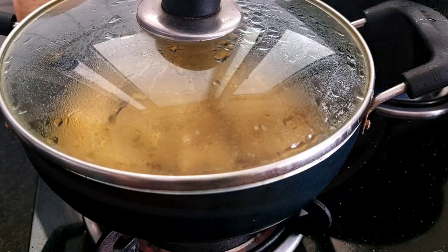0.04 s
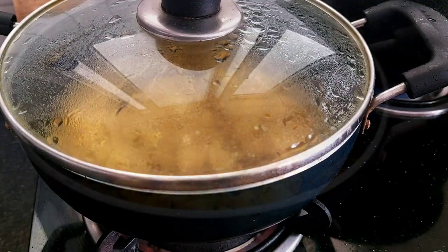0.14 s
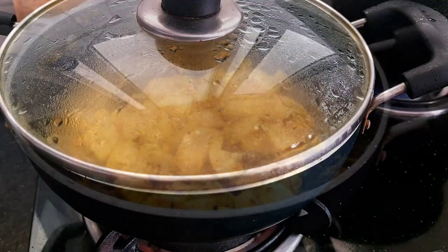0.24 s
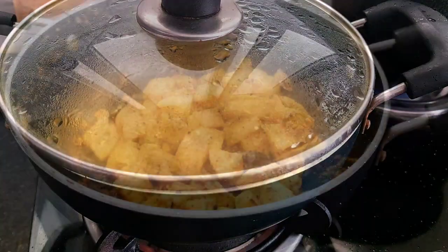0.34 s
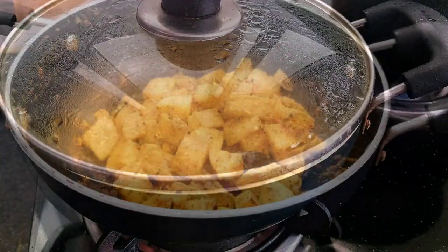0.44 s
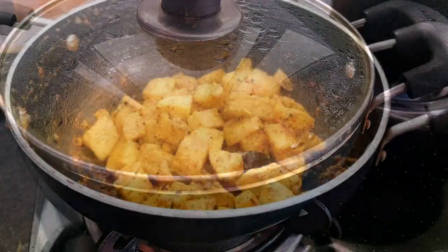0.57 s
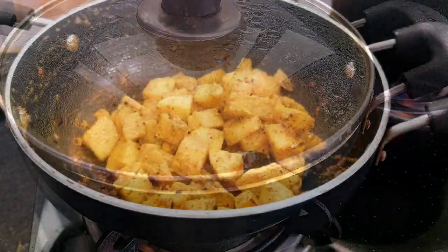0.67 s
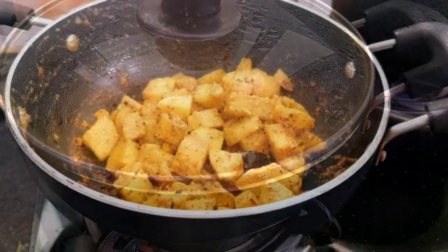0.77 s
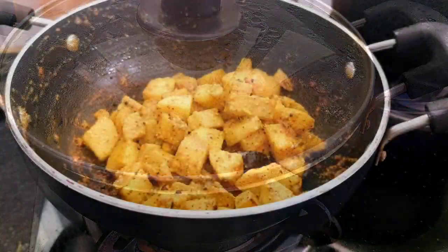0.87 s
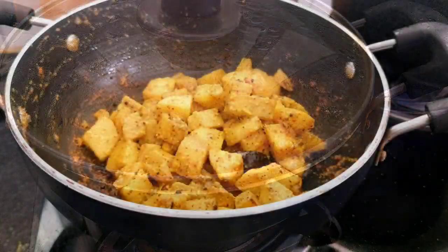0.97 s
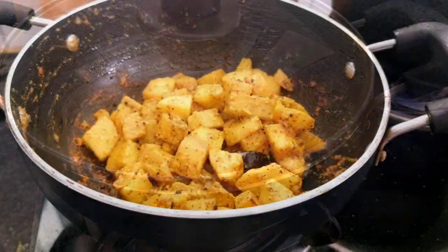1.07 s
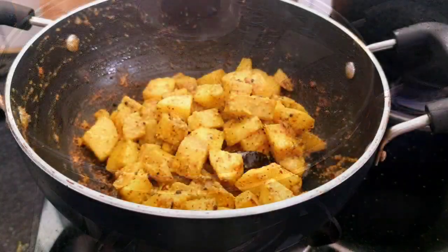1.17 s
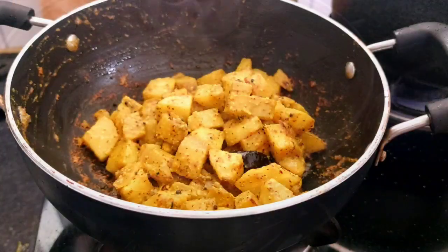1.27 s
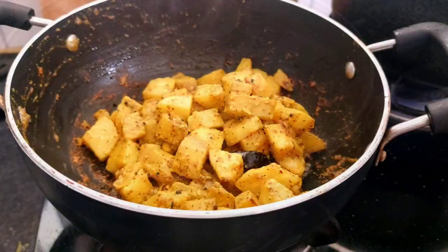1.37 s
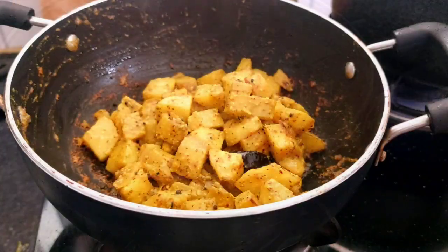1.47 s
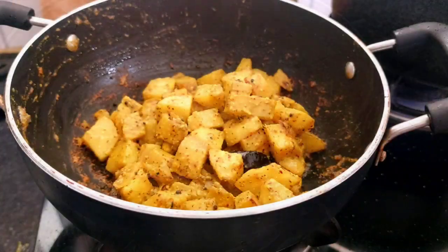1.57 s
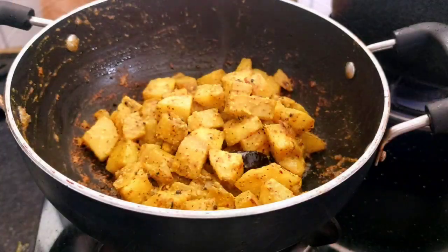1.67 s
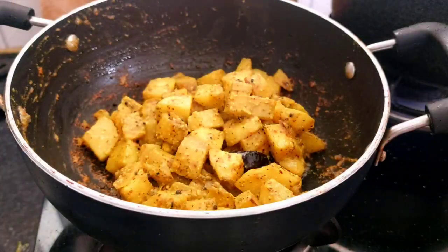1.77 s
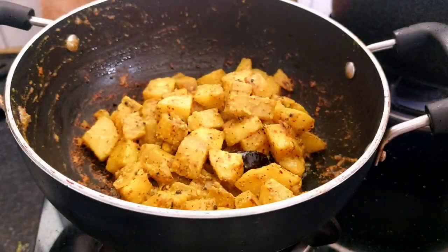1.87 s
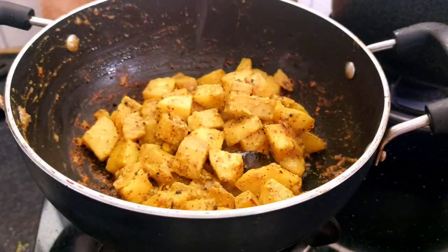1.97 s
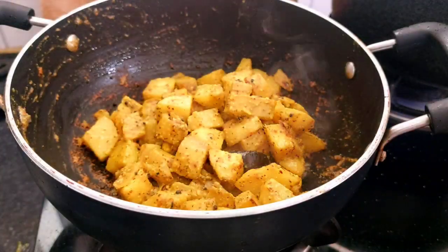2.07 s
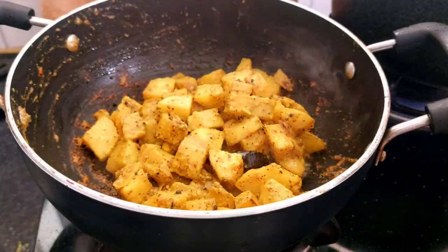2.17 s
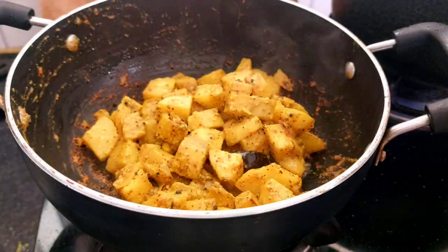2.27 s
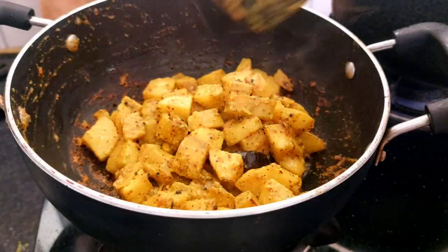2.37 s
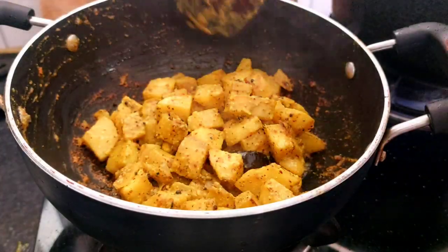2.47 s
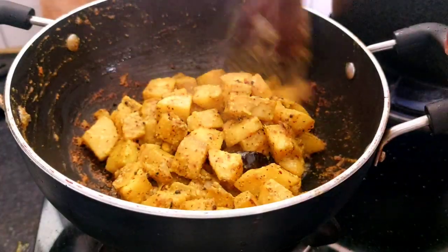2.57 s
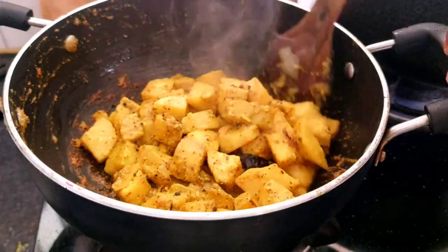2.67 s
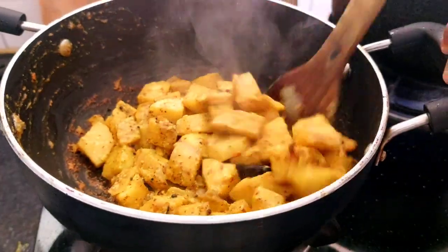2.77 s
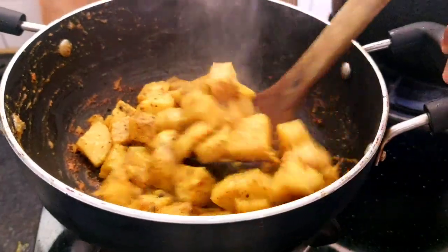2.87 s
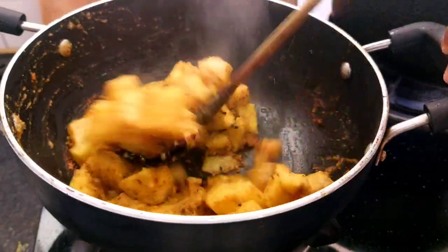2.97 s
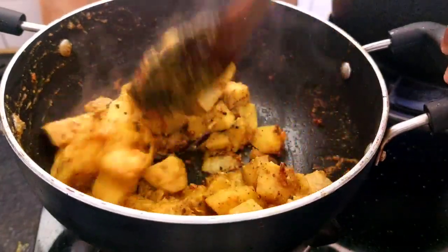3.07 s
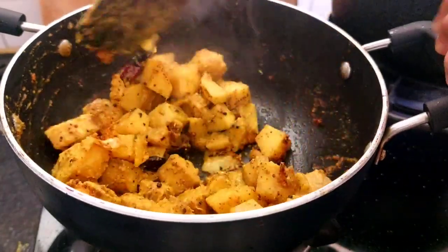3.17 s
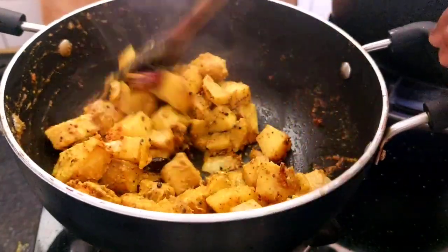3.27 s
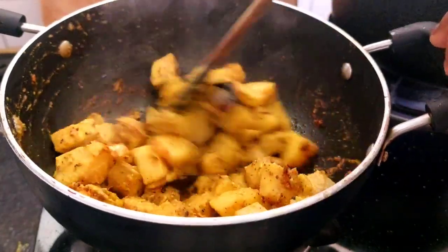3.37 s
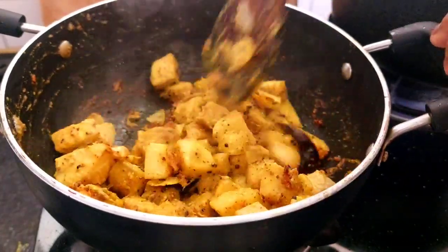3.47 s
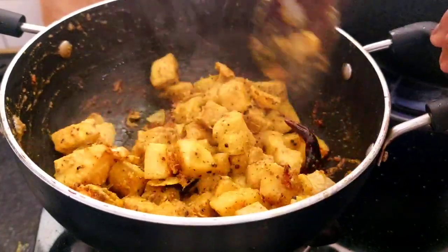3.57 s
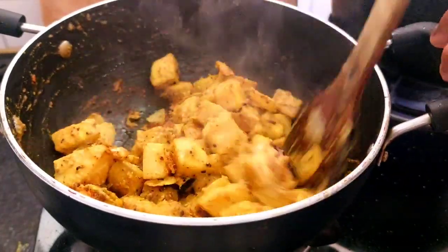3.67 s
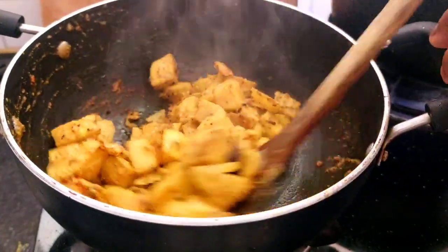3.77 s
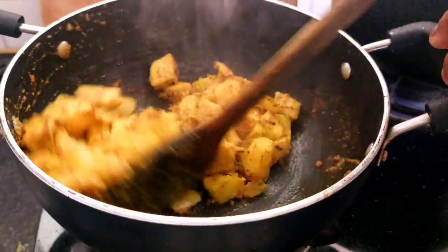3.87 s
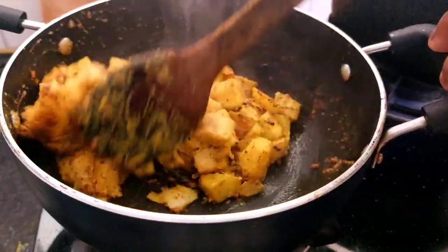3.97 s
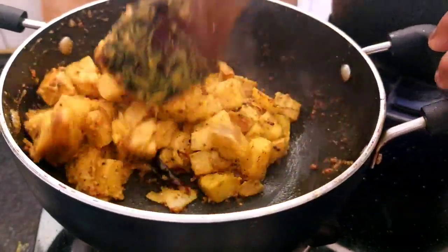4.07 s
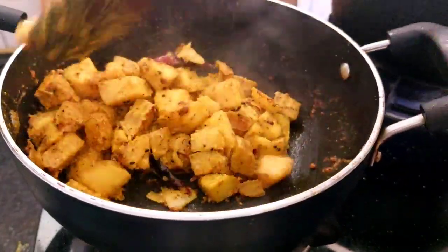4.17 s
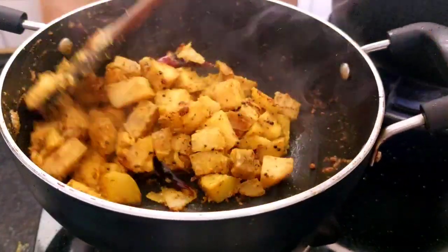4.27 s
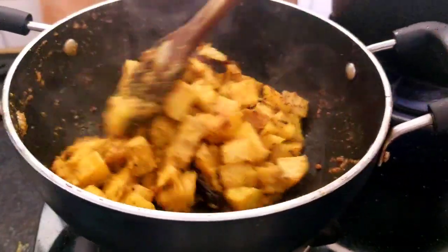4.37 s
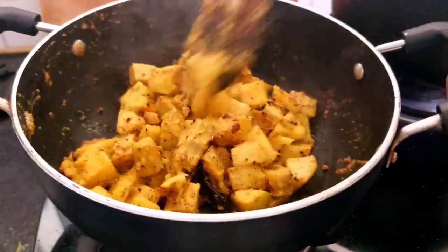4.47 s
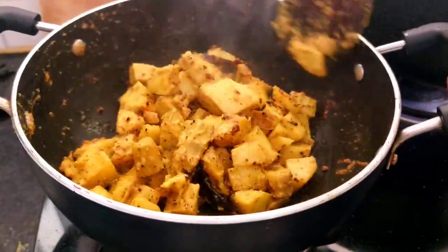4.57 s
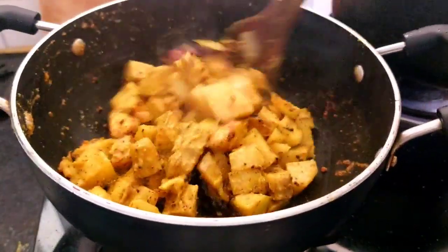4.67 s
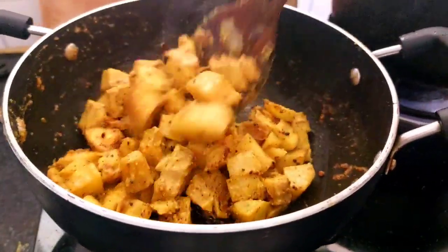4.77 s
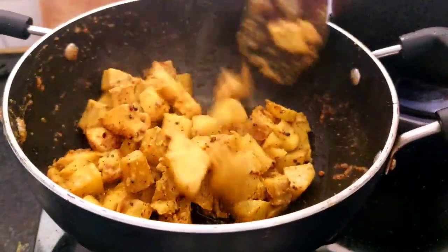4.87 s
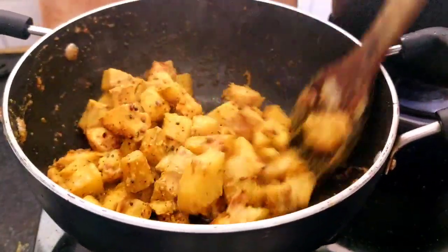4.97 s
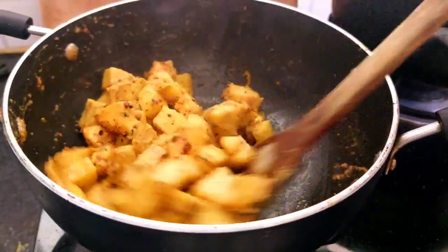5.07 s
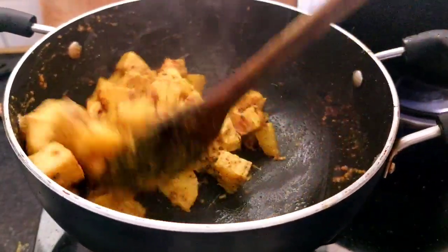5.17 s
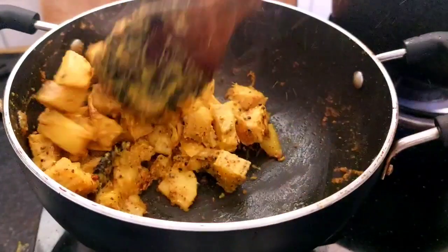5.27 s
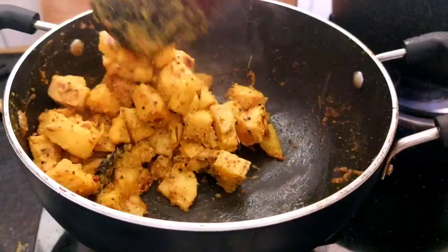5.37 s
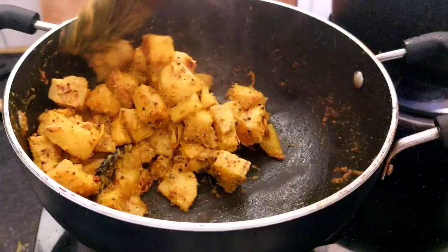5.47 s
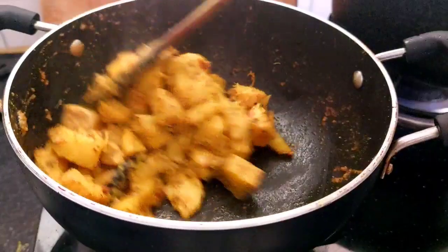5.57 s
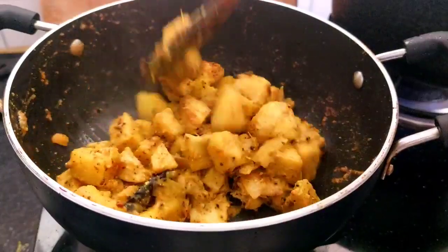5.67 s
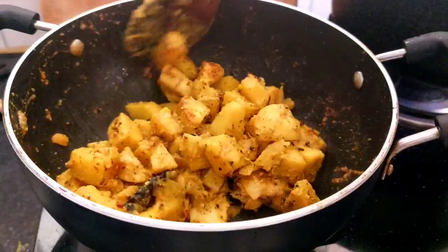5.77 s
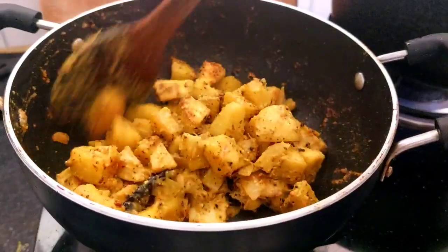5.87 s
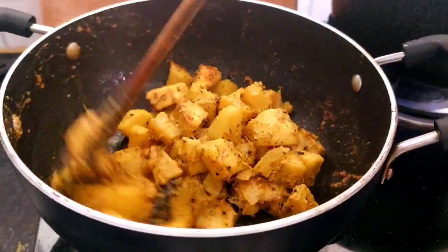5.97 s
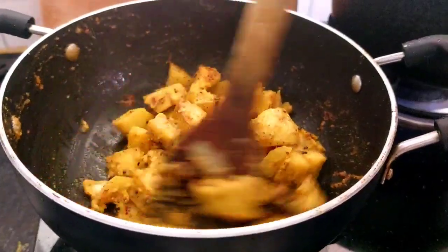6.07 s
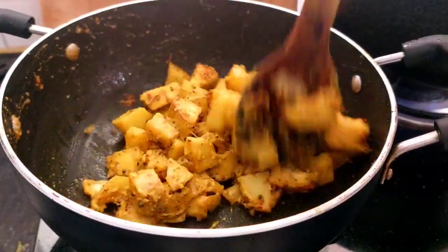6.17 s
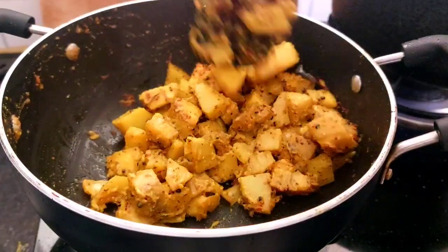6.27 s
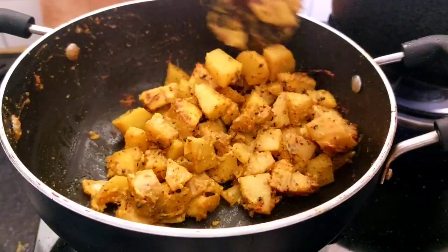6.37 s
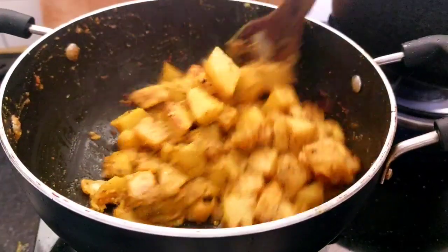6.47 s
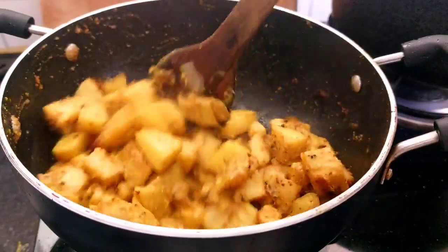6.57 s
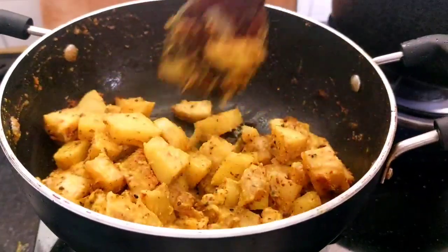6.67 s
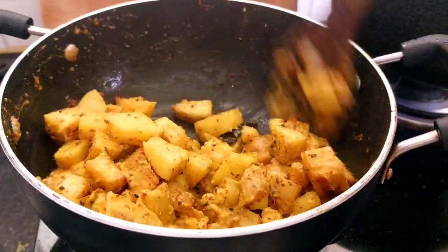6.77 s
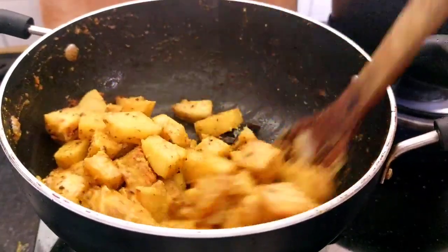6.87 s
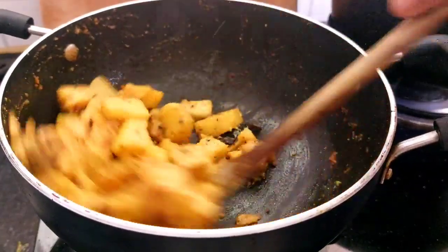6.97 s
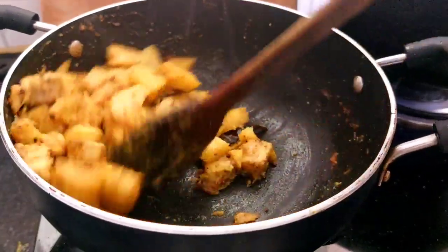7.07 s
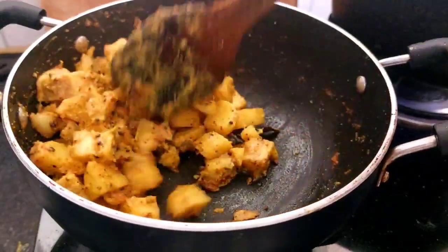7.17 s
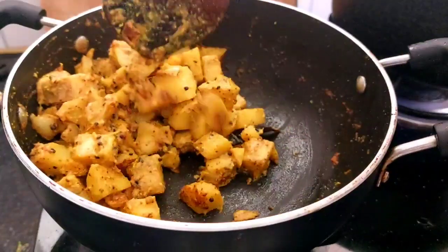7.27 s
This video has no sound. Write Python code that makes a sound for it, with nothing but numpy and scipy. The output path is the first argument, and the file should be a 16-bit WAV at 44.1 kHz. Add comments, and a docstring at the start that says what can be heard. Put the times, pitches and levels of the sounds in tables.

```python
"""Diced vegetables fry in oil over a gas burner, close by, in a small kitchen.
The sound fades in: the flame flutters, steam bubbles crackle, water drops spit in the oil.
At 1 s a glass lid is put down to one side and rings; from 1.5 s on, the pan is knocked.
From 2.7 s a wooden spatula scrapes and turns the pieces: wet faces meet hot metal
and the sizzle swells in repeated flares."""
import sys
import numpy as np
from scipy import signal
from scipy.fft import rfft, irfft
from scipy.io import wavfile
from scipy.ndimage import uniform_filter1d

SR = 44100
rng = np.random.default_rng(int(sys.argv[2]) if len(sys.argv) > 2 else 0)


def unload_wav(signal):
    """Save mono or channel-first audio to the path in sys.argv[1] as 16-bit WAV at rate SR, clipped to [-1, 1]."""
    wavfile.write(
        sys.argv[1],
        SR,
        np.round(np.clip(np.atleast_2d(signal).T, -1, 1) * 32767).astype(np.int16),
    )


N = 323253
TIME_S = np.arange(N) / SR
FREQ_HZ = np.fft.rfftfreq(N, 1 / SR)


def gain(db):
    """Decibels to amplitude."""
    return 10 ** (np.asarray(db) / 20)


def unit_rms(x):
    """Scales to rms 1."""
    return x / np.sqrt(np.mean(x ** 2) + 1e-20)


def at_hz(curve, hz):
    """Interpolates on a log-frequency axis."""
    freqs, values = np.transpose(curve)
    return np.interp(np.log(hz + 1), np.log(freqs + 1), values)


def add(mix, start_s, sound):
    """Mixes a sound in at start_s."""
    part = mix[..., round(start_s * SR):][..., :sound.shape[-1]]
    part += sound[..., :part.shape[-1]]


def balance(left_db):
    """Stereo gains for a left-minus-right level."""
    return gain(np.array([[.5], [-.5]]) * left_db)


def drift(cutoff_hz):
    """Slow random fluctuation, rms 1."""
    return unit_rms(irfft(rfft(rng.standard_normal(N)) / (1 + (FREQ_HZ / cutoff_hz) ** 4), N))


def stirring(t, start_s=2.68, rise_s=0.044):
    """0 before the spatula sets to work, 1 after."""
    return np.clip((t - start_s) / rise_s, 0, 1)


# left-right likeness: (frequency [Hz], coherence [0-1])
COHERENCE = [(60, 0.77), (150, 0.93), (300, 0.78), (600, 0.68), (1200, 0.13), (2200, 0.03), (16000, 0.02)]
# stereo balance: (frequency [Hz], left minus right [dB])
BALANCE = [(60, 12.5), (99, 0), (160, 7), (270, -2.5), (450, 1), (740, 1), (1220, 3), (2010, 3), (3330, 0),
           (5500, 2.0), (9080, 2.5), (15000, -0.5)]
def coloured(pair, spectrum):
    """Shapes spectrum and stereo image; long waves reach both sides alike."""
    spectra = rfft(pair)
    angle = np.arcsin(np.clip(at_hz(COHERENCE, FREQ_HZ), 0, 1)) / 2
    blended = spectra * np.cos(angle) + spectra[::-1] * np.sin(angle)
    shaped = blended * gain(at_hz(spectrum, FREQ_HZ)) * balance(at_hz(BALANCE, FREQ_HZ))
    return unit_rms(irfft(shaped, N))


# reverberation: (frequency [Hz], t60 [s])
ROOM_DECAY = [(150, 0.35), (600, 0.24), (3000, 0.25), (15000, 0.053)]
def kitchen(pair, build_s=0.0038):
    """Diffuse reflections from near walls, each band dying at its own rate."""
    onset = np.clip(TIME_S[:SR // 2] / build_s - .5, 0, 1)
    hz, t, bands = signal.stft(rng.standard_normal((2, len(onset))) * onset, SR, nperseg=256)
    coherence = np.clip(at_hz(COHERENCE, hz), 0, 1)[:, None]
    bands[1] = coherence * bands[0] + np.sqrt(1 - coherence ** 2) * bands[1]
    decay = gain(-60 * t / at_hz(ROOM_DECAY, hz)[:, None])
    tail = signal.istft(bands * decay, SR, nperseg=256)[1]
    return signal.fftconvolve(pair, tail / np.linalg.norm(tail[0]), axes=1)[:, :N]


# flame loudness: (time [s], level [dB])
FLAME_LEVEL = [(0, -53.5), (1.1, -50.5), (1.4, -51.5), (4.8, -55), (5.5, -58), (7.33, -59)]
# flame spectrum: (frequency [Hz], density [dB])
FLAME_SPECTRUM = [(15, -26), (30, -11), (50, -10), (68, -0.5), (82, -2), (98, 0.5), (135, -7), (200, -7),
                  (400, -16), (1000, -45)]
def burner():
    """The gas flame flutters low under the pan."""
    level_db = np.interp(TIME_S, *np.transpose(FLAME_LEVEL))
    return coloured(rng.standard_normal((2, N)), FLAME_SPECTRUM) * gain(level_db)


# spectrum of the shifting pieces: (frequency [Hz], density [dB])
TUMBLE_SPECTRUM = [(100, -23), (190, -8.5), (245, -3.5), (300, -1.5), (390, -1.5), (560, -6.5), (750, -5),
                   (1100, -11.5), (3000, -68)]
def tumble(calm_db=-52, stirred_db=-50, lumpy_db=2):
    """Soft pieces shift and bubble against the pan in dull lumps, more so when stirred."""
    lumps = rng.standard_normal((2, N)) * gain(lumpy_db * drift(cutoff_hz=44.4))
    level_db = calm_db + (stirred_db - calm_db) * stirring(TIME_S)
    return coloured(lumps, TUMBLE_SPECTRUM) * gain(level_db)


# spatula drags: (start [s], end [s], level [dB])
SPATULA_STROKES = [(2.65, 2.944, -45), (4.40, 5.28, -45.5), (5.696, 6.45, -46)]
def scraping(ring_hz=1430, width_hz=170, overtone=0.65, slips_per_s=1500):
    """Wood slips over the gritty pan in tiny jerks, ringing two modes of its wall."""
    pressure = np.zeros(N)
    for start_s, end_s, db in SPATULA_STROKES:
        add(pressure, start_s, gain(db) * signal.windows.tukey(round((end_s - start_s) * SR), .5))
    slips = rng.standard_normal((2, N)) * (rng.random((2, N)) < slips_per_s / SR)
    low, high = (unit_rms(signal.lfilter(*signal.iirpeak(hz, ring_hz / width_hz, fs=SR), slips))
                 for hz in (ring_hz, 2 * ring_hz))
    return pressure * (low + overtone * high)


def blow_spectrum(hz, centre_hz, spread_oct):
    """How strongly a blow excites each frequency: a bell curve in octaves."""
    return np.exp(-.5 * (np.log2(hz / centre_hz) / spread_oct) ** 2)


def knocks(blows, modes, level_db, chatter, thud, click, room_db, left_db, phase_spread_rad,
           thud_s=0.012, bounces_per_s=900):
    """Each blow and its chatter ring the modes; the contact adds a thud and an optional click."""
    out, t = np.zeros((2, N)), TIME_S[:8192]
    bins_hz = np.fft.rfftfreq(len(t), 1 / SR) + 1
    mode_hz, mode_db, t60_s = np.transpose(modes)[:, :, None]
    click_band = signal.butter(2, [900, 3200], "bandpass", fs=SR)
    polarity_rad = np.pi * np.arange(len(modes))[:, None]
    for start_s, db, centre_hz, spread_oct, chatter_s in blows:
        rise = 1 - np.exp(-4 * t * centre_hz * spread_oct ** 2)  # narrow spectrum: slow push
        phase = polarity_rad + phase_spread_rad * rng.standard_normal((2, len(modes), 1))
        envelopes = gain(mode_db - 60 * t / t60_s) * blow_spectrum(mode_hz, centre_hz, spread_oct)
        ring = (envelopes * np.sin(2 * np.pi * mode_hz * t + phase)).sum(1) * rise
        bounces = rng.choice([-1, 1], len(t)) * (rng.random(len(t)) < bounces_per_s / SR)
        force = chatter * bounces * np.exp(-(t / (2 * chatter_s)) ** 2)
        force[0] = 1  # the blow itself
        knock = unit_rms(signal.fftconvolve(ring, force[None], axes=1)[:, :len(t)])
        contact = rise * np.exp(-t / (thud_s + chatter_s))
        dull = irfft(rfft(rng.standard_normal(len(t))) * blow_spectrum(bins_hz, centre_hz, spread_oct))
        knock += thud * unit_rms(contact * dull)
        knock /= abs(knock).max()
        bright = unit_rms(signal.lfilter(*click_band, rng.standard_normal((2, len(t)))))
        knock += click * spread_oct ** 2 * contact * bright
        add(out, start_s, knock * gain(db + level_db))
    return (out + gain(room_db) * kitchen(out)) * balance(left_db)


# lid on counter: (time [s], relative level [dB], centre [Hz], spread [oct], chatter [s])
LID_BLOWS = [(.968, -24.5, 450, 1.27, 0.0038), (.985, -31, 700, 0.096, 0.0049),
             (1.027, -20, 555, 0.87, 0.0044), (1.039, -24.5, 394, 1.7, 0.019),
             (1.062, -21, 680, 0.51, 0.0023), (1.083, -32.5, 380, 1.1, 0.01)]
# lid modes: (frequency [Hz], level [dB], t60 [s])
LID_RING = [(100, -1, 0.17), (244, 4.5, 0.046), (350, 1.5, 0.072), (424, -3, .06), (518, 1.5, 0.067),
            (603, 4.5, 0.047), (723, 2.5, 0.047), (830, 2, 0.026), (1080, -7, 0.058), (1600, -22, 0.055),
            (2050, -6, .05)]
def lid():
    """The glass lid clatters onto the counter."""
    return knocks(LID_BLOWS, LID_RING, level_db=5, chatter=0.38, thud=0.15, click=0,
                  room_db=-6, left_db=-2.5, phase_spread_rad=0.76)


# knocks on pan and stove: (time [s], relative level [dB], centre [Hz], spread [oct], chatter [s])
PAN_BLOWS = [(1.51, -39.5, 98.7, 0.67, 0.089), (1.768, -33, 470, 0.36, .012),
             (1.790, -18, 446, 0.34, 0.0092), (1.818, -27, 535, 0.87, 0.01),
             (2.597, -31, 384, 0.34, 0.0051), (3.375, -26, 280, 1.05, 0.018),
             (3.387, -35.5, 149, 0.69, 0.0093), (3.453, -30, 222, 1.05, 0.0088),
             (3.674, -27, 397, 0.54, 0.0075), (3.700, -29.5, 330, 0.77, .011),
             (4.205, -25, 330, 1.16, 0.012), (4.240, -31.5, 270, 0.7, 0.0083),
             (4.360, -31.5, 387, 0.51, 0.0063), (4.535, -25.5, 406, 1, 0.021), (4.575, -35, 95, 1, .02),
             (4.674, -27.5, 387, 0.47, 0.021), (4.755, -32.5, 328, 1.2, .0084),
             (4.998, -27, 400, 1.7, 0.0074), (5.021, -29.5, 352, 0.51, 0.027),
             (5.731, -34.5, 320, 1.2, 0.0095), (6.494, -27, 350, 0.99, 0.0095),
             (6.857, -26, 890, 1.47, 0.014)]
# pan modes: (frequency [Hz], level [dB], t60 [s])
PAN_RING = [(95.7, -0.5, 0.16), (194, -3, 0.051), (227.4, -1.5, 0.13), (253.4, -2, 0.12), (336, -6, 0.064),
            (388.7, -1, 0.097), (439, -5, 0.043), (516, -5, 0.037), (728, -3.5, 0.073), (822, 1.5, 0.043),
            (1520, -20, .05)]
def pan():
    """The knocked pan and stove ring low, with a wooden click on hard blows."""
    return knocks(PAN_BLOWS, PAN_RING, level_db=2.5, chatter=0.17, thud=0.3, click=0.15,
                  room_db=-9.5, left_db=-1.5, phase_spread_rad=0.6)


# single loud spits: (time [s], relative peak [dB])
OIL_SPITS = [(0.203, -8), (0.927, -6), (1.4721, -14), (1.6701, -15), (2.136, -19), (2.23, -5)]
def spits(level_db=-3, decay_s=0.00078, room_db=-5):
    """Water drops explode in the oil, one sharp snap each."""
    out, t = np.zeros((2, N)), TIME_S[:128]
    for start_s, db in OIL_SPITS:
        snap = np.diff(rng.standard_normal((2, len(t) + 1))) * np.exp(-t / decay_s)
        add(out, start_s, snap / abs(snap).max() * gain(db + level_db))
    return out + gain(room_db) * kitchen(out)


def bubbles(per_s, spread_db, max_spreads, band_hz, decay_cycles, pitches=32):
    """Steam bubbles burst as tiny damped rings, reaching each side by a different path."""
    onsets = np.flatnonzero(rng.random(N) < per_s / SR)
    size = gain(spread_db * np.minimum(rng.exponential(1, N), max_spreads))[onsets]
    pitch = rng.integers(0, pitches, N)[onsets]
    out, t = np.zeros((2, N + 128)), TIME_S[:64]
    hz = np.linspace(*band_hz, pitches)[:, None]
    pops = np.sin(2 * np.pi * hz * t) * np.exp(-t * hz / decay_cycles)
    pops /= np.linalg.norm(pops, axis=1, keepdims=True)
    for side in out:
        arrivals = onsets + rng.integers(0, 24, N)[onsets]
        path_gain = (rng.choice([-1, 1], N) * rng.uniform(0.93, 1, N))[onsets]
        np.add.at(side, arrivals[:, None] + np.arange(len(t)), (path_gain * size)[:, None] * pops[pitch])
    return unit_rms(out[:, :N])


def wake(pair, tail_s=0.0032):
    """Pan wall and room smear each burst into a short noisy tail."""
    pole = np.exp(-1 / (tail_s * SR))
    power = signal.lfilter([1 - pole], [1, -pole], (pair ** 2).mean(0))
    return np.sqrt(power) * rng.standard_normal((2, N))


# air resonances in the pan: (centre [Hz], width [Hz], lift [dB])
BOWL_RESONANCES = [(760, 270, 4), (1431, 146, 6.5), (1990, 810, 4), (2890, 200, 3.5), (5120, 1130, 2),
                   (7540, 1900, 4), (11750, 2500, 1.5)]
def bowl(pair):
    """The hollow of the pan lifts a few broad bands."""
    lift_db = sum(db / (1 + (2 * (FREQ_HZ - centre_hz) / width_hz) ** 2)
                  for centre_hz, width_hz, db in BOWL_RESONANCES)
    return irfft(rfft(pair) * gain(lift_db), N)


def vents(shape, depth_db=1.2):
    """Steam escapes through gaps that open and close, each briefly favouring its own band."""
    across_bands = uniform_filter1d(rng.standard_normal(shape), size=7, axis=1)
    patches = uniform_filter1d(across_bands, size=6, axis=2)
    return gain(depth_db * unit_rms(patches))


# oil flares from jolts, drips or wet faces on the metal:
# (start [s], length [s], level [dB], tilt [dB/oct])
OIL_FLARES = [(1.775, 0.13, -36, -2.5), (2.058, 0.37, -34, 2.5), (2.407, 0.15, -40.5, 1.5),
              (2.644, 0.29, -28, -0.35), (3.03, 0.44, -30.5, .5), (3.3, 0.59, -27.5, 0),
              (3.67, 0.93, -28, 1), (4.297, 0.66, -29.5, -1), (4.71, 0.29, -29, 0), (4.876, 0.73, -27, 0.1),
              (5.285, 0.49, -32, -1.5), (5.535, 0.8, -27, 0.8), (6.178, 0.58, -28, 0),
              (6.553, 0.26, -26.5, 2.5), (6.706, .29, -29.5, .6), (7.092, 0.27, -30, 2)]
def frying(hz, t, pivot_hz=7000, lowest_hz=1330, flare_skew=0.69):
    """Gain by band and time, steady frying plus flares: large bubbles are dull, fine spray bright."""
    octaves = np.log2(np.maximum(hz, lowest_hz) / pivot_hz)[:, None]
    power = lambda db, db_per_oct: gain(db + db_per_oct * octaves) ** 2
    total = power(db=-37.5, db_per_oct=0.36) + power(db=-29, db_per_oct=0.23) * stirring(t)
    for start_s, length_s, db, db_per_oct in OIL_FLARES:
        progress = np.clip((t - start_s) / length_s, 0, 1)
        arch = np.sin(np.pi * progress ** flare_skew)  # fast rise, slower fall
        total += power(db, db_per_oct) * arch ** 2
    return np.sqrt(total)


# sizzle colour: (frequency [Hz], gain [dB])
SIZZLE_COLOUR = [(250, -27), (520, -11), (1100, -4.5), (1700, -5.5), (2400, -1.5), (4000, 1.5), (6200, -2),
                 (9700, -2), (13500, 0.5), (15500, -0.5)]
def sizzle(wake_db=-2, flutter_db=0.5, surge_db=-0.04):
    """Countless small bursts blend to a fizz; larger ones stand out most before the stirring."""
    fizz = bubbles(per_s=14000, spread_db=2.2, max_spreads=4, band_hz=(700, 19000), decay_cycles=.8)
    crackle = bubbles(per_s=800, spread_db=4, max_spreads=2.8, band_hz=(2200, 16000), decay_cycles=.9)
    ticks = bubbles(per_s=150, spread_db=5, max_spreads=2.9, band_hz=(11000, 16000), decay_cycles=1.6)
    stirred = stirring(TIME_S)
    crackle_db, ticks_db = -4 - 6 * stirred, -6 - 8 * stirred
    oil = fizz + crackle * gain(crackle_db) + ticks * gain(ticks_db)
    oil += gain(wake_db) * wake(oil)
    oil *= gain(flutter_db * drift(cutoff_hz=46.7))
    oil = bowl(coloured(oil, SIZZLE_COLOUR))
    oil /= np.sqrt(uniform_filter1d((oil ** 2).mean(0), size=8001))  # flat level ahead of frying()
    hz, t, bands = signal.stft(oil, SR, nperseg=512)
    bands *= frying(hz, t) * vents(bands.shape)
    oil = signal.istft(bands, SR, nperseg=512)[1][:, :N]
    return oil * gain(surge_db * drift(cutoff_hz=6.8))


def scene():
    """Lid, pan, oil, flame, pieces and spatula together."""
    return lid() + pan() + sizzle() + spits() + burner() + tumble() + scraping()


def record(dry, open_s=0.22, fade_s=1.864, fade_power=1.49, cutoff_hz=15650):
    """A quick opening from silence within a longer fade-in, then a steep low-pass."""
    opening = np.minimum(TIME_S / open_s, 1) ** 2
    fade = np.minimum(TIME_S / fade_s, 1) ** fade_power
    lowpass = signal.firwin(511, cutoff_hz, window=("kaiser", 9), fs=SR)
    return signal.oaconvolve(dry * opening * fade, lowpass[None], "same")


dry = scene()
out = record(dry)
unload_wav(out)
```